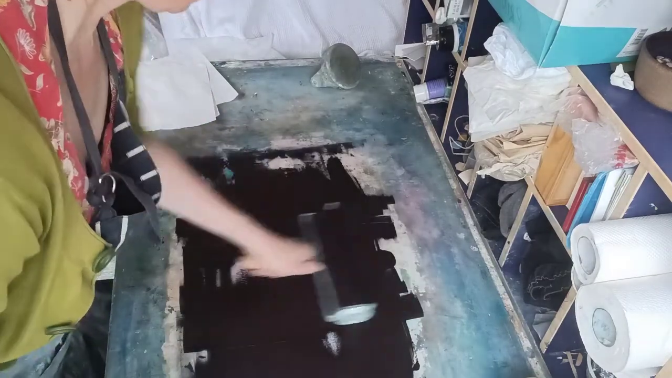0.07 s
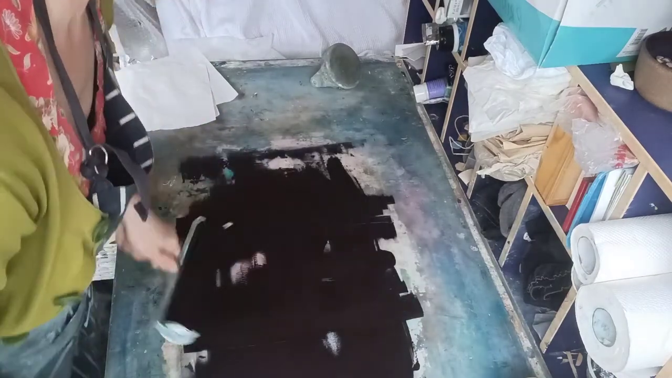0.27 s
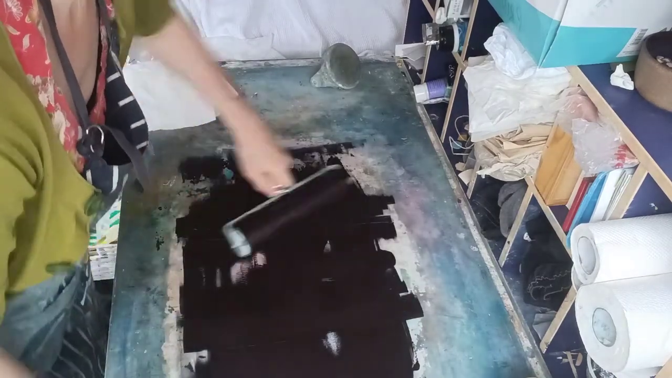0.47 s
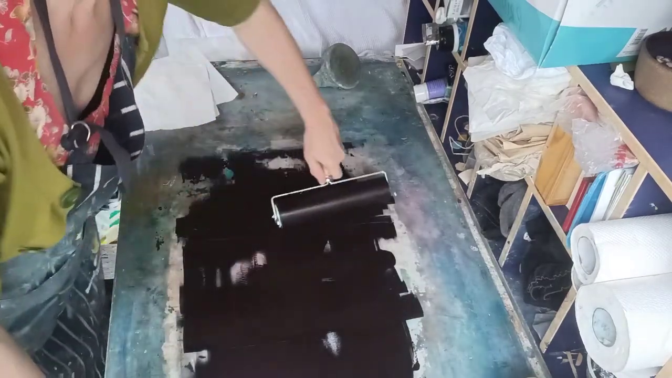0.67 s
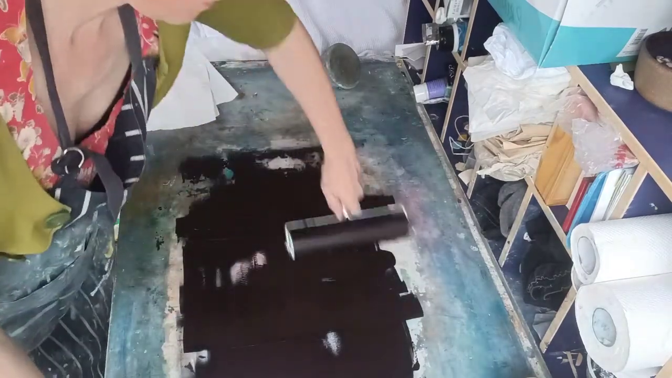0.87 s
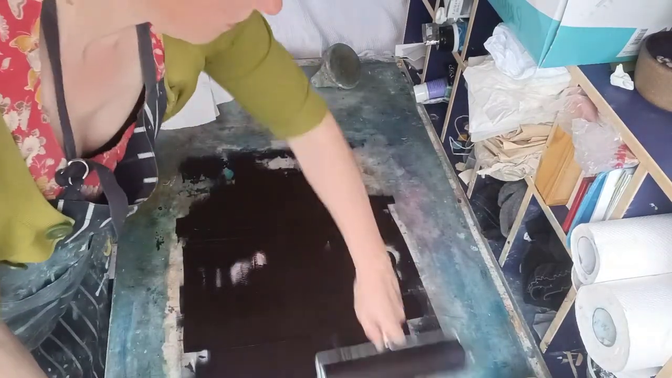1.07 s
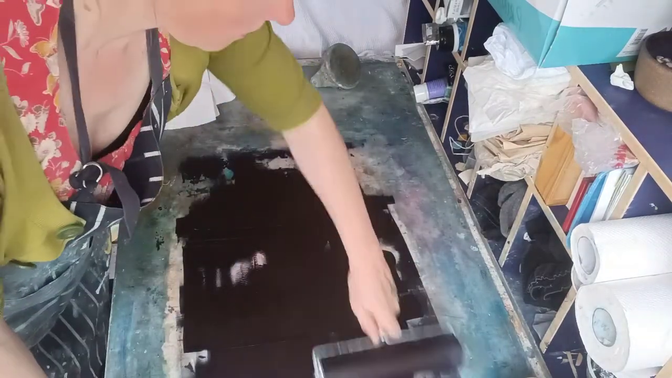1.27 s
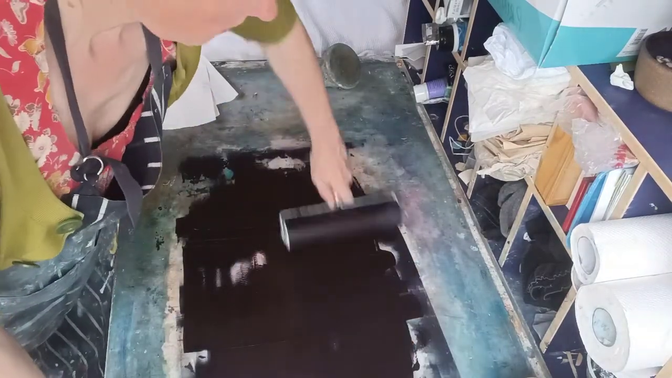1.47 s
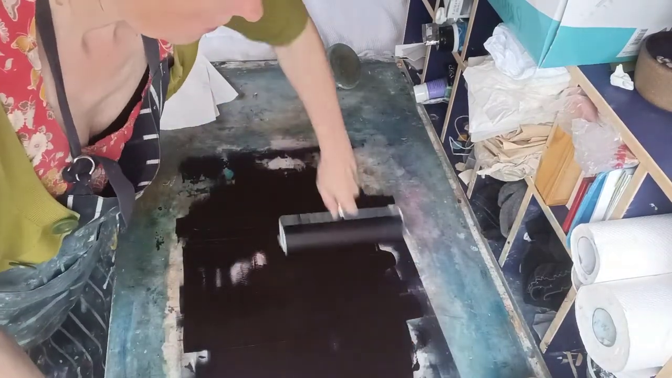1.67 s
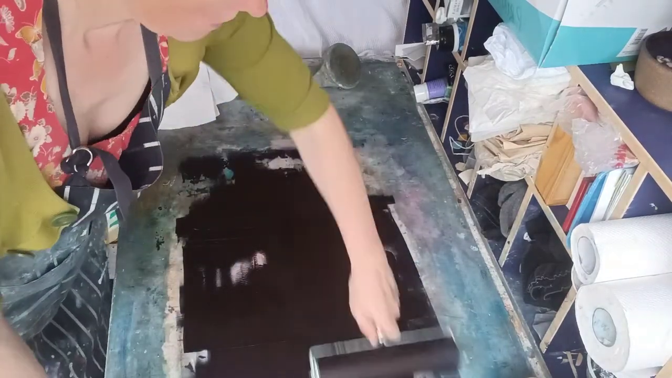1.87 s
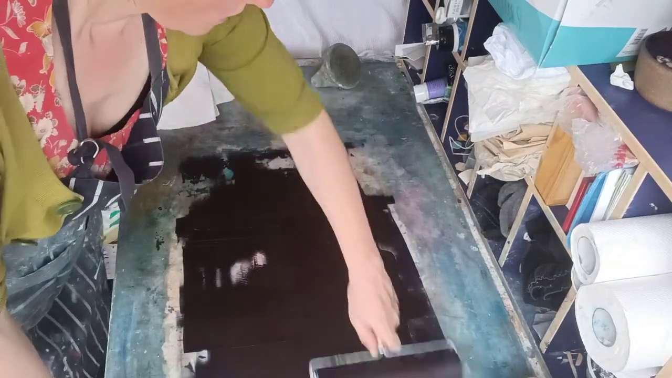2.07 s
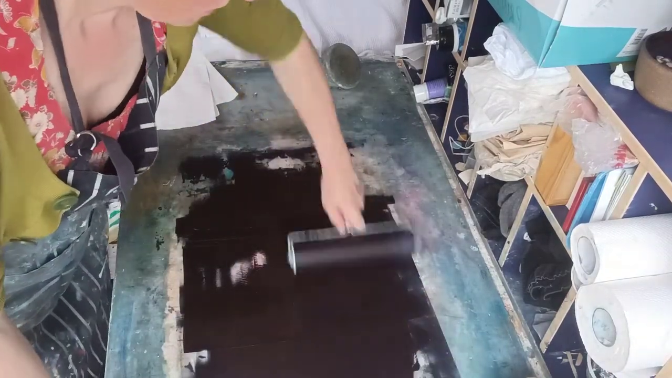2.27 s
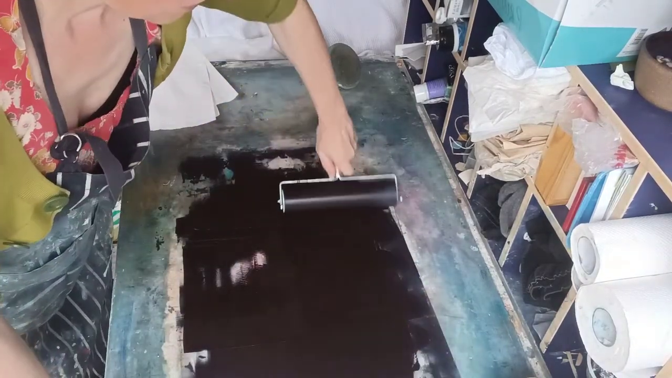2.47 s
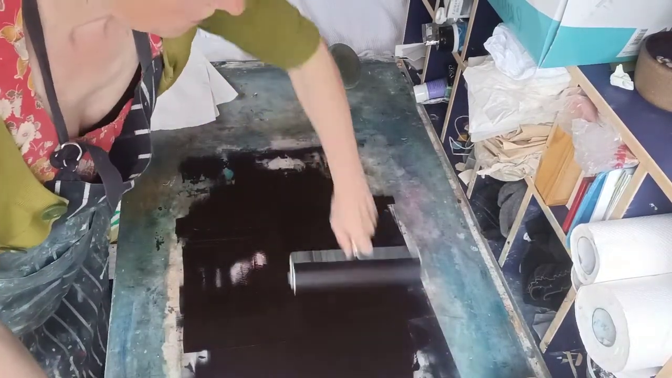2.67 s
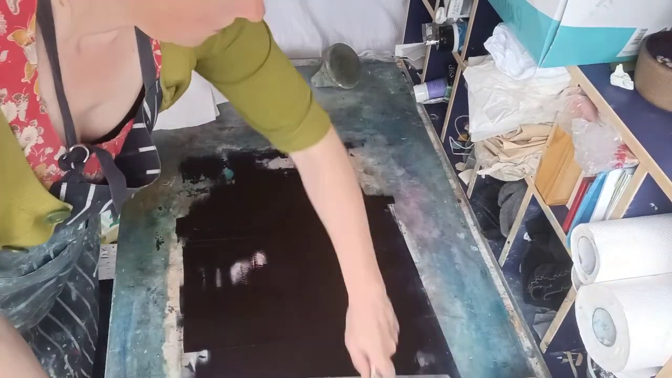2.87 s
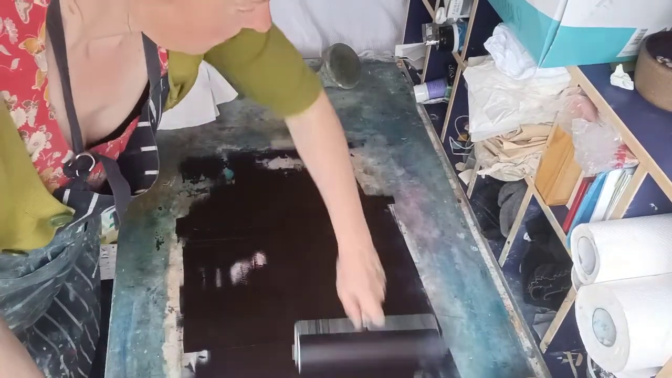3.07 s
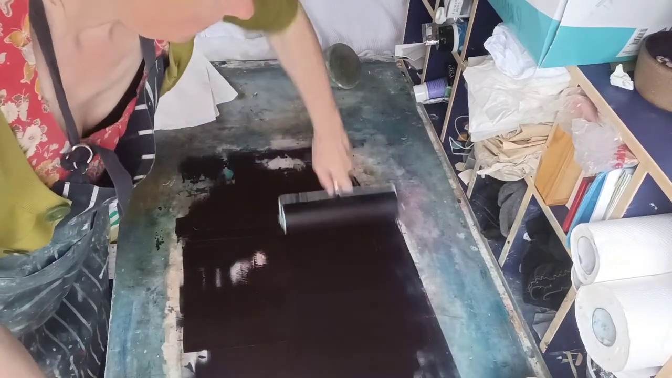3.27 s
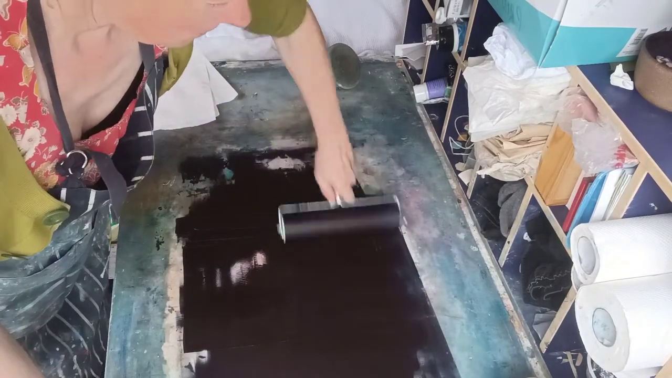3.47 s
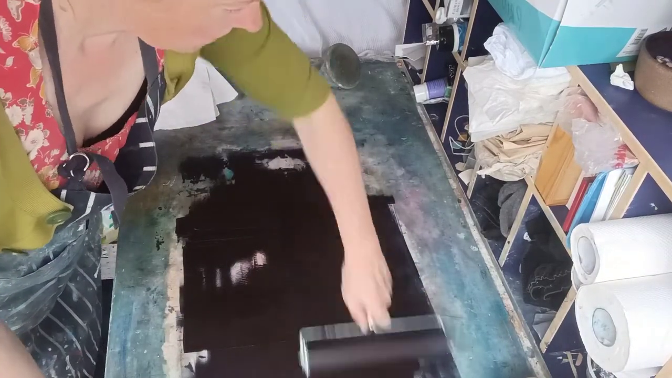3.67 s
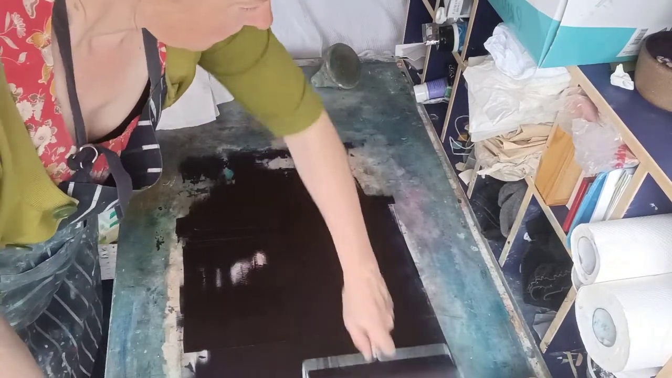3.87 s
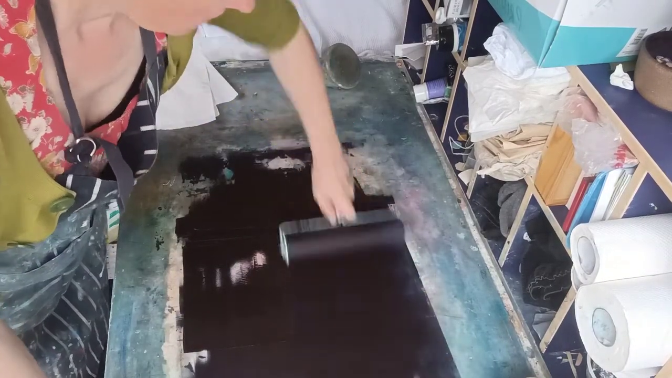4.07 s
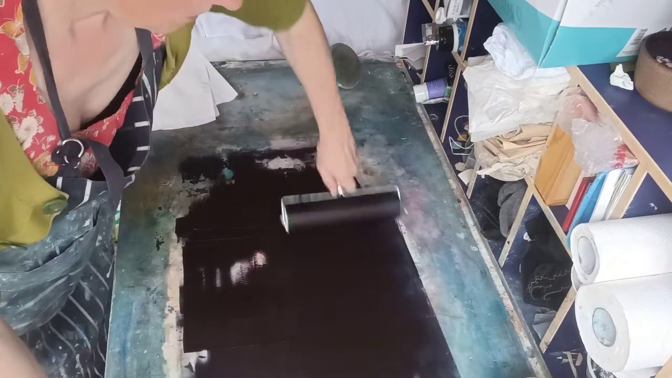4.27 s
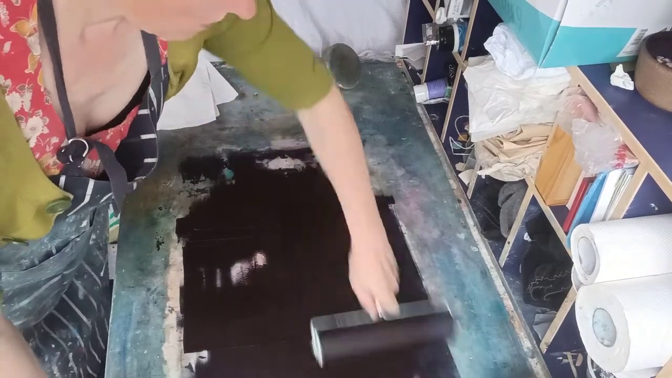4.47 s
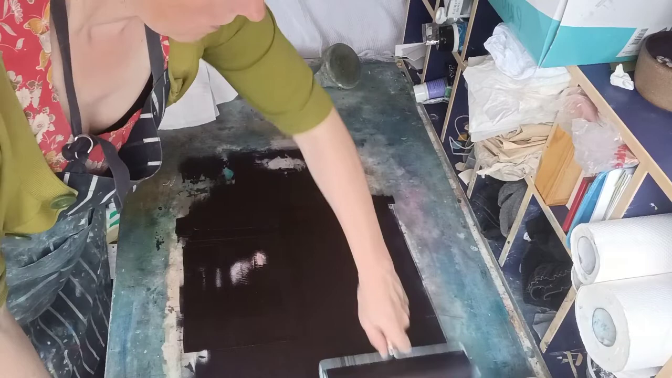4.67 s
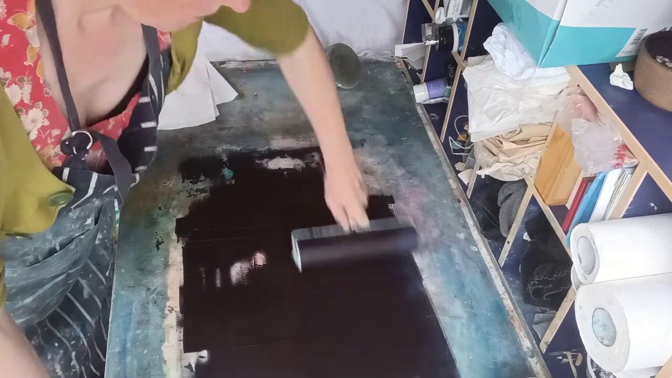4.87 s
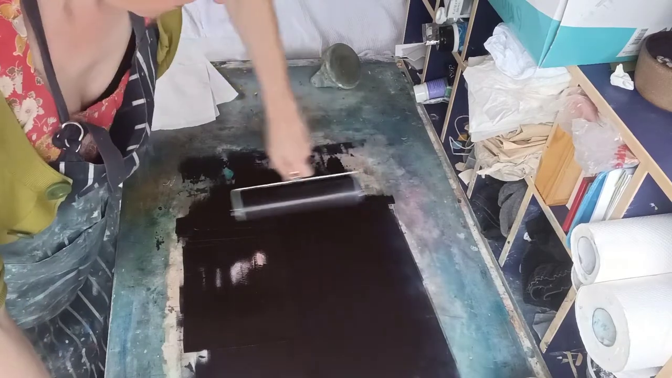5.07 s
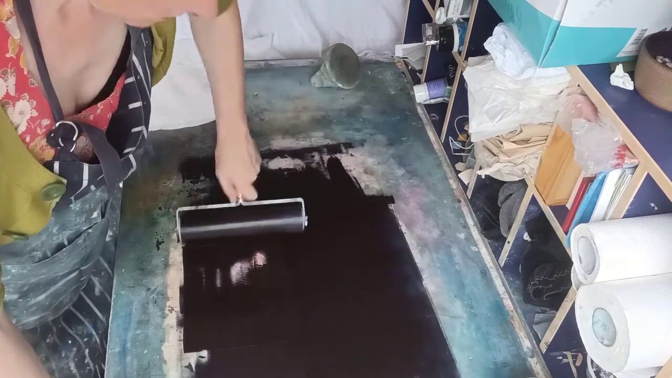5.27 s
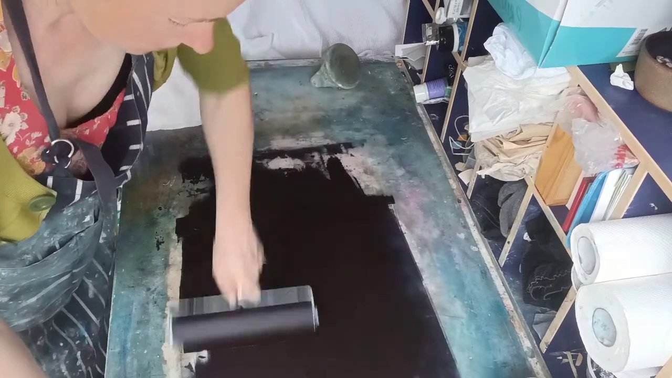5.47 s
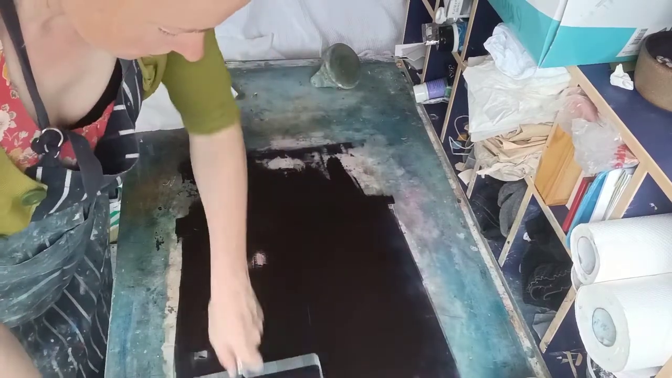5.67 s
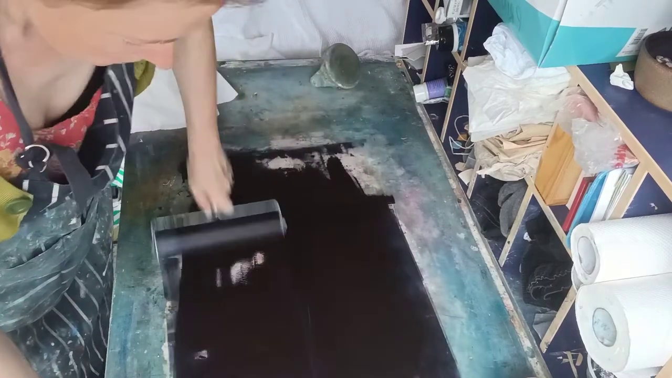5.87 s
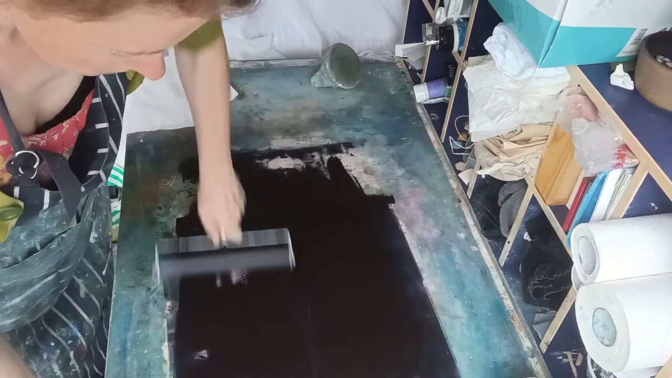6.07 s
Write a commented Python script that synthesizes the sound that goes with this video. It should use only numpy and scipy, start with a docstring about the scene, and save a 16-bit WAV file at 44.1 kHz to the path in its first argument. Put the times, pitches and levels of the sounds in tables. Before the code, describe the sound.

Close up in a small room, tacky ink hisses and crackles under a hand roller, stroke after stroke, the loose frame clicking between low table knocks.

```python
"""Ink sizzles as a rubber hand roller spreads it over a work table in quick strokes, to and fro, in a small room.
Random clicks make the snapping ink threads, the wet squelch, the table rumble and the grinding bearings.
Dying modes ring the table and roller as the roller thumps down on the far side and bumps over ridges of ink.
The loose axle clacks in its frame, a short burst with an echo and a ring; a sleeve and the room's air are
filtered noise."""
import sys
import numpy as np
from scipy import signal
from scipy.fft import rfft, irfft
from scipy.io import wavfile
from scipy.ndimage import uniform_filter1d

SR = 44100
rng = np.random.default_rng(int(sys.argv[2]) if len(sys.argv) > 2 else 0)


def pcm_store(signal):
    """Save signal as 16-bit PCM."""
    levels = np.round(np.clip(np.atleast_2d(signal), -1, 1) * 32767)
    wavfile.write(sys.argv[1], SR, levels.astype(np.int16).T)


N = 270112  # length [samples]

# Quiet of the room: (frequency [Hz], density [dB per Hz])
AIR_SPECTRUM = [(15, -36.5), (25, -47), (105, 5.5), (141, -2.5), (285, -5), (326, -11.5), (677, -19),
                (1070, -18), (1160, -23), (2220, -26.5), (2480, -27), (7310, -30), (16000, -28.5)]
AIR_DB = -76

# Reverberation: (frequency [Hz], t60 [s])
ROOM_T60 = [(100, 0.24), (1000, 0.12), (6000, 0.098), (15000, 0.095)]

# Stereo width: (frequency [Hz], side over mid [dB])
STEREO_WIDTH = [(80, -23.5), (350, -12), (700, -3.5), (1500, -2.5), (3000, 0.5), (7000, 0.5), (7900, -8.5),
                (15000, -14.5)]

# Balance of the microphones: (frequency [Hz], left over right [dB])
MIC_BALANCE = [(60, -0.5), (200, -1.6), (400, 1), (4400, .5), (8100, -0.2), (15000, -2)]
EDGE_HZ = 15800  # top of the band

# Sleeve brushing as the arm swings: (time [s], level [dB], half length [s])
SLEEVE_BRUSHES = [(0.33, -79, 0.02), (0.53, -76.5, 0.02), (0.598, -66, 0.035)]
# Swish of the cloth: (frequency [Hz], density [dB per Hz])
CLOTH_SPECTRUM = [(200, -1), (1500, 0.0), (3000, 0.5), (7000, -5), (10500, -10), (13000, -18)]

# Axle knocking in its frame: (time [s], level [dB], tilt [dB per octave])
AXLE_CLACKS = [(0.321, -67, -4), (0.624, -55, -12), (0.7174, -31.5, 7.5), (0.955, -36.5, -0.5),
               (1.1835, -31, -4), (1.546, -28, 11.5), (1.9999, -23, -1.5), (2.393, -41, 10),
               (2.423, -29, 10.5), (2.5427, -31.5, 2.5), (2.812, -47.5, -4.5), (2.9397, -31.5, 3.5),
               (2.946, -29.5, 2), (2.9767, -20, 17.5), (3.3333, -30.5, 6.5), (3.8057, -23, -3),
               (3.823, -20, 12.5), (3.439, -34.5, -1.5), (4.1675, -26.5, 7.5), (4.2603, -31, 1.5),
               (4.611, -32, -3.5), (4.766, -31.5, 10), (5.2094, -28.5, 10), (5.213, -23.5, 3),
               (5.508, -43.5, 3), (5.6075, -37, -5.5)]
# Colour of the roller frame: (frequency [Hz], density [dB per Hz])
FRAME_SPECTRUM = [(300, -33.5), (800, -14), (1400, -6.5), (2000, -1), (2600, 3.5), (3400, 0), (5000, 0),
                  (7000, -7), (10000, -26), (16000, -23)]
# Dying of the frame's ring: (frequency [Hz], t60 [s])
FRAME_T60 = [(800, 0.066), (1800, 0.17), (2600, 0.22), (3600, 0.21), (9000, 0.037)]
# A knock rings the roller too, the more the duller it is
AXLE_HZ, AXLE_RING_DB, AXLE_RING_PER_TILT = 2580, -12, 1.0
GRIP_T60_S = .16  # added damping of that note by the hand's grip

# Modes of the table top: (frequency [Hz], level [dB], t60 [s])
TABLE_MODES = [(93.1, 4, 0.21), (114.9, 6.5, 0.13), (163.9, 2.5, 0.17), (260, -5.5, 0.22),
               (317.4, 5.5, 0.065), (379.5, 4, 0.11), (499, -19.5, 0.27), (585.6, -17.5, 0.16),
               (680, -9, 0.13), (737, -8, 0.064), (830.6, -5, 0.084), (1041, -12, 0.027), (1172, -12, 0.11),
               (1290, -8.5, 0.073), (1502, -8, 0.07), (1570, -17, .07), (1943, -15, .1),
               (2245, -12.5, 0.091), (2445, -13, .1)]
# Modes of the roller and its handle: (frequency [Hz], level [dB], t60 [s])
ROLLER_MODES = [(726, 2, 0.078), (840, -5, 0.13), (1140, -18.5, .07), (1380, 10, 0.069), (1420, 1.5, 0.14),
                (1483, 9.5, 0.063), (1570, -15, 0.1), (1898, 5, 0.11), (2180, -11, .09),
                (2070, -6.5, 0.079), (2316, -2, 0.073), (2570, 3, 0.1)]

# Roller bumping over ridges of ink: (time [s], level [dB], softening above [Hz])
RIDGE_BUMPS = [(0.847, -37.5, 130), (0.951, -34.5, 120), (1.323, -30, 110), (1.427, -38.5, 170),
               (1.695, -32, 110), (1.75, -40.5, 250), (2.19, -38, 110), (2.217, -35, 110),
               (2.538, -32.5, 250), (2.629, -39.5, 110), (3.018, -36, 200), (3.108, -28, 151),
               (3.66, -47, 100), (3.952, -29.5, 126.7), (4.049, -34, 171), (4.252, -29.5, 200),
               (4.353, -30, 240), (4.785, -30.5, 150), (5.411, -35, 200), (5.778, -20, 450),
               (5.81, -31.5, 260), (5.961, -26.5, 298), (6.041, -29.5, 387)]
# Roller landing on the table: (time [s], level [dB], softening above [Hz],
# ink splat [dB], roller ring [dB], strongest roller ring at [Hz]); splat and ring are relative to the level
LANDINGS = [(.585, -38.5, 100, -36, -8, 1270), (0.6193, -24.5, 423, -7, -11, 1650),
            (.629, -29, 90, -11, -15, 1300), (1.504, -25.5, 170, -17.5, -37, 770),
            (2.3895, -21.5, 190, -16, -14, 740), (3.295, -32, 163, -21.5, -36, 790),
            (4.124, -52.5, 100, -18, -5, 1800), (4.166, -11, 600, -17, -38.5, 1283),
            (5.1818, -19, 700, -9, -10, 1420), (5.202, -14, 200, -9.5, -15.5, 1640),
            (5.215, -28, 333, -5, -8.5, 1640), (5.83, -42, 181, -25, -0.5, 740),
            (5.922, -31, 168, -11, -25, 1520)]
# Wet slap of the ink: (frequency [Hz], density [dB per Hz])
SPLAT_SPECTRUM = [(40, -18), (150, 13), (300, 4), (520, -6.5), (750, -0.5), (1100, -11), (1500, -11.5),
                  (2200, -8), (3000, -15.5), (6000, -12), (8000, -19.5), (9500, -9), (12500, -29),
                  (16000, -25.5)]

# Grinding of the bearings: (frequency [Hz], density [dB per Hz])
GRIND_SPECTRUM = [(1000, -27.5), (1750, -2.5), (2000, -4), (2250, -11.5), (2550, 2), (2900, -2.5),
                  (5000, -13)]
# Rumble of the table: (frequency [Hz], density [dB per Hz])
RUMBLE_SPECTRUM = [(25, -8), (50, -36.5), (75, -6), (100, 7.5), (130, 0.5), (170, 2.5), (215, -13.5),
                   (280, -8.5), (380, -5.5), (490, -46.5), (780, -44), (2000, -61)]
# Popping of the wet film: (frequency [Hz], density [dB per Hz])
SQUELCH_SPECTRUM = [(130, -7), (230, 6.5), (320, 14), (400, 9), (490, 4.5), (620, -1.5), (830, 0.5),
                    (1020, -11.5), (1180, -8.5), (1600, -11.5), (3000, -27.5), (8000, -50)]
# Tearing of thick ink threads: (frequency [Hz], density [dB per Hz])
TEAR_SPECTRUM = [(600, -24.5), (1050, -24), (1450, -14.5), (1750, -9), (2600, -6.5), (3200, -0.5),
                 (4200, 2), (6000, 4), (7800, 2), (10000, -25), (15000, -37.5)]
# Sizzle of fine ink threads: (frequency [Hz], density [dB per Hz])
SIZZLE_SPECTRUM = [(5000, -40), (7800, -19), (9000, -8), (10000, -2.8), (11000, -7.2), (12200, -12.3),
                   (13850, -13), (14500, -4.5), (15000, 0), (15800, -.3), (16100, -30)]

# Strokes of the hand, pushes and pulls in turn: (start [s], end [s], speeding up [s], slowing down [s],
# hardest press at [s], half length of the press [s], sizzle [dB], tearing [dB], squelch [dB],
# rumble [dB], grinding [dB]); the layers trim some of these levels further
HAND_STROKES = [(-0.25, 0.195, 0.15, 0.17, 0.077, 0.15, -41.5, -51.5, -51.5, -44.5, -67),
                (0.602, 1.068, 0.37, 0.18, 0.932, 0.11, -36, -46, -45, -38.5, -54),
                (1.083, 1.481, 0.18, 0.076, 1.279, 0.17, -37.5, -47.5, -50.5, -42.5, -60.5),
                (1.466, 1.87, 0.16, 0.15, 1.699, 0.063, -40, -49, -44.5, -39.5, -56.5),
                (1.906, 2.359, 0.14, 0.12, 2.094, 0.089, -38.5, -50.5, -49.5, -46.5, -68),
                (2.358, 2.842, 0.23, 0.19, 2.644, 0.11, -41, -48, -48, -43, -62.5),
                (2.832, 3.277, 0.18, 0.1, 3.053, 0.097, -38.0, -50, -51, -47, -65),
                (3.265, 3.694, 0.22, 0.13, 3.558, 0.19, -41, -49.5, -51.5, -40.5, -59),
                (3.708, 4.102, 0.13, 0.062, 3.916, 0.16, -38.5, -50.5, -52, -43, -63.5),
                (4.146, 4.5, 0.088, 0.11, 4.356, 0.15, -42, -51, -50, -43.5, -58),
                (4.538, 4.906, 0.095, 0.079, 4.711, 0.11, -38, -51.5, -50, -43, -62.5),
                (5.188, 5.555, 0.26, 0.2, 5.405, 0.13, -36, -43.5, -43, -36.5, -63.5),
                (5.521, 5.899, 0.13, 0.11, 5.813, 0.22, -36.5, -46, -45, -44, -61),
                (5.866, 6.3, 0.16, 0.15, 6.023, 0.22, -39, -46.5, -43, -40.5, -58)]
# How sizzle, tearing, squelch, rumble and grinding follow the hand, one row each: (power of the speed [-],
# loss away from the hardest press [dB], loss before the weight is on [dB]); a negative loss is a gain
HAND_LAWS = [(2.28, 0.36, 0), (2.2, -1.33, 9.5), (2.3, 23, 32), (2.9, 2.5, 52), (1.34, -1, 18.5)]
LEAN_PUSH_S, LEAN_PULL_S = 0.13, .02  # time the hand takes to put its weight on the roller


def gain_of(db):
    """Decibels to amplitude."""
    return 10 ** (np.asarray(db) / 20)


def evened(x):
    """Scales to rms 1."""
    return x / np.sqrt(np.mean(x ** 2) + 1e-20)


def ease(u):
    """A quarter sine from 0 to 1."""
    return np.sin(np.pi / 2 * np.clip(u, 0, 1))


def read(points, hz):
    """Reads a curve on a log-frequency axis."""
    f, value = np.transpose(points)
    return np.interp(np.log(hz + 1), np.log(f + 1), value)


def add(mix, s, sound):
    """Mixes a sound in at time s."""
    part = mix[max(round(s * SR), 0):][:len(sound)]
    part += sound[:len(part)]


def colour(x, points, tilt_db=0):
    """Minimum-phase filter of unit energy with the given spectrum, tilted about 3 kHz in dB per octave."""
    size = 4096
    hz = abs(np.fft.fftfreq(size, 1 / SR))
    octaves = np.log2((hz + 300) / 3300)  # flattens out in the bass
    log_gain = np.log(gain_of(read(points, hz) + tilt_db * octaves))
    response = np.exp(signal.hilbert(log_gain).conj())
    taps = np.fft.ifft(response).real[:size // 2]
    return signal.oaconvolve(x, taps / np.linalg.norm(taps))[:len(x)]


def dying(x, t60s):
    """Lets each band of x die at its own speed."""
    hz, t, bands = signal.stft(x, SR, nperseg=256)
    decay = gain_of(-60 * t / read(t60s, hz)[:, None])
    return signal.istft(bands * decay, SR, nperseg=256)[1][:len(x)]


def wander(rate_hz):
    """Slow random drift of rms 1, rolling off above the given rate."""
    hz = np.fft.rfftfreq(N, 1 / SR)
    slowed = rfft(rng.standard_normal(N)) / (1 + (hz / rate_hz) ** 2)
    return evened(irfft(slowed, N))


def snaps(per_s, spread_db):
    """Random clicks of uneven size and either sign, rms 1."""
    size = gain_of(spread_db * np.minimum(rng.exponential(1, N), 5))
    size = size * rng.choice([-1, 1], N)
    return evened(size * (rng.random(N) < per_s / SR))


def patchy(x, depth_db, count, order):
    """The colour drifts in patches of count frames by order bins as the roller moves across the table."""
    bands = signal.stft(x, SR, nperseg=1024)[2]
    field = uniform_filter1d(rng.standard_normal(bands.shape), count, 1)
    field = evened(uniform_filter1d(field, order, 0))
    return evened(signal.istft(bands * gain_of(depth_db * field), SR, nperseg=1024)[1][:N])


def rings(modes, weight):
    """The sum of dying modes, each weighted by a function of its frequency; peak 1."""
    t = np.arange(round(.5 * SR)) / SR
    hz, db, t60 = np.transpose(modes)[:, :, None]
    place = 1 + 0.009 * rng.standard_normal(hz.shape)  # the load differs a little from spot to spot
    sign = (-1) ** np.arange(1, len(hz) + 1)[:, None]
    envelope = sign * weight(hz) * gain_of(db - 60 * t / t60)
    ring = (envelope * np.sin(2 * np.pi * hz * place * t)).sum(0)
    return ring / abs(ring).max()


def room_air():
    """The quiet of the room is steady coloured noise."""
    return gain_of(AIR_DB) * evened(colour(rng.standard_normal(N), AIR_SPECTRUM))


def room(x, wet_db=-19):
    """A short, faint tail of dying noise from the cluttered room."""
    tail = dying(rng.standard_normal(SR // 3), ROOM_T60)
    tail[:SR // 200] = 0  # the tail waits 5 ms
    return x + gain_of(wet_db) * signal.oaconvolve(x, tail / np.linalg.norm(tail))[:N]


def sleeve():
    """Cloth swishes softly: coloured noise under smooth swells."""
    t = np.arange(N) / SR
    swell = sum(gain_of(db) * np.exp(-((t - s) / half_s) ** 2) for s, db, half_s in SLEEVE_BRUSHES)
    return swell * evened(colour(rng.standard_normal(N), CLOTH_SPECTRUM))


def table_ring(soft_hz, spring=0.26):
    """A soft blow rings the table's low modes, a hard one the middle ones."""
    return rings(TABLE_MODES, lambda hz: 1 / (1 + (hz / soft_hz) ** 2) / np.hypot(1, spring * soft_hz / hz))


def roller_ring(free_hz, reach_octaves=0.28):
    """The roller itself rings briefly, in the modes that the hand leaves free."""
    return rings(ROLLER_MODES, lambda hz: 1 / (1 + (np.log2(hz / free_hz) / reach_octaves) ** 2))


def clacks(hit_db=4, echo_s=0.0012, echo_db=-2, crack_s=0.0044, crack_db=-11, ring_db=-22):
    """A sharp knock of the axle, its echo off the table, the frame's dense ring and a damped roller note."""
    out, t = np.zeros(N), np.arange(SR // 5) / SR
    for s, db, tilt_db in AXLE_CLACKS:
        crack, ring = rng.standard_normal((2, len(t)))
        knock = gain_of(crack_db) * crack * np.exp(-t / crack_s)
        knock += gain_of(ring_db) * dying(ring, FRAME_T60)
        knock[[0, round(echo_s * SR)]] += gain_of([hit_db, echo_db])
        note_db = AXLE_RING_DB - AXLE_RING_PER_TILT * tilt_db - 60 * t / GRIP_T60_S
        note = roller_ring(AXLE_HZ)[:len(t)] * gain_of(note_db)
        add(out, s, gain_of(db) * (colour(knock, FRAME_SPECTRUM, tilt_db) + note))
    return out


def bumps(climb_s=0.00297):
    """Ridges of ink nudge the table top as the roller climbs them."""
    out = np.zeros(N)
    for s, db, soft_hz in RIDGE_BUMPS:
        ring = table_ring(soft_hz)
        t = np.arange(len(ring)) / SR
        add(out, s, gain_of(db) * ring * (1 - np.exp(-t / climb_s)))
    return out


def thumps(splat_t60=0.11, contact_s=0.0025, punch_db=-1, punch_s=0.0076):
    """Each landing rings the table, punched up at first, and the roller; the ink slaps."""
    out = np.zeros(N)
    for s, db, soft_hz, splat_db, ring_db, free_hz in LANDINGS:
        table = table_ring(soft_hz)
        t = np.arange(len(table)) / SR
        punch = np.sqrt(.5 + 2 * gain_of(punch_db) * np.exp(-t / punch_s))
        slap = colour(rng.standard_normal(len(t)) * gain_of(-60 * t / splat_t60), SPLAT_SPECTRUM)
        blow = punch * table + gain_of(ring_db) * roller_ring(free_hz) + gain_of(splat_db) * slap
        add(out, s, gain_of(db) * blow * (1 - np.exp(-t / contact_s)))
    return out


def bearings(load):
    """Fine grit in the bearings rubs under the load of the hand."""
    return load * evened(colour(snaps(per_s=6700, spread_db=4.5), GRIND_SPECTRUM))


def rumble(weight, bounce_db=-8, bounce_s=0.021):
    """Small lumps in the ink shake the table top, less so around each thump or bump as the roller rebounds."""
    t, lift = np.arange(N) / SR, np.zeros(N)
    for s, *_ in LANDINGS + RIDGE_BUMPS:
        lift = np.maximum(lift, 1 - abs(t - s - bounce_s / 2) / (2 * bounce_s))
    lumps = colour(snaps(per_s=770, spread_db=2.5), RUMBLE_SPECTRUM)
    return gain_of(bounce_db * lift) * weight * patchy(lumps, depth_db=5, count=4, order=3)


def squelch(wet, thick, pluck_db=-15, lowest_hz=900):
    """The wet film pops under the roller, and the thickest threads pluck the table's upper modes."""
    pops = colour(snaps(per_s=1500, spread_db=2), SQUELCH_SPECTRUM)
    film = patchy(pops, depth_db=3, count=5, order=3)
    ring = rings(TABLE_MODES, lambda hz: 1 / (1 + (lowest_hz / hz) ** 4))
    plucks = evened(signal.oaconvolve(snaps(per_s=1500, spread_db=6.5), ring)[:N])
    return wet * film + gain_of(pluck_db) * thick * plucks


def stroke_gains():
    """The hand speeds up, holds and slows down, pressing hardest on the way; five rolling sounds follow it."""
    t, gains = np.arange(N) / SR, np.zeros((len(HAND_LAWS), N))
    for k, (start, end, rise_s, fall_s, press_at, press_s, *levels_db) in enumerate(HAND_STROKES):
        on = (t > start) & (t < end)
        speed = ease((t[on] - start) / rise_s) * ease((end - t[on]) / fall_s)
        lean = ease((t[on] - start) / (LEAN_PULL_S if k % 2 else LEAN_PUSH_S))
        press = np.exp(-((t[on] - press_at) / press_s) ** 2)
        for gain, db, (power, slack_db, light_db) in zip(gains, levels_db, HAND_LAWS):
            held_db = db - slack_db * (1 - press) - light_db * (1 - lean)
            gain[on] += speed ** power * gain_of(held_db)
    return gains


def ink(fine, thick, thick_db=-1.5, flutter_db=1.4, coarse_db=-9, echo_s=0.001395, echo_db=-14):
    """Threads of ink stretch and snap along the line where the roller lifts off; a few coarse ones crackle."""
    tack = gain_of(flutter_db * wander(rate_hz=15))
    fine_snaps = colour(snaps(per_s=24000, spread_db=3.5), SIZZLE_SPECTRUM)
    sizzle = patchy(fine_snaps, depth_db=1.5, count=4, order=10)
    coarse = gain_of(coarse_db) * snaps(per_s=270, spread_db=3)
    thick_snaps = colour(snaps(per_s=8000, spread_db=1.5) + coarse, TEAR_SPECTRUM)
    # a near reflection ripples the colour
    thick_snaps = thick_snaps + gain_of(echo_db) * np.roll(thick_snaps, round(echo_s * SR))
    tearing = patchy(thick_snaps, depth_db=3.5, count=6, order=4)
    return tack * (fine * sizzle + gain_of(thick_db) * thick * tearing)


def sources(fine, thick, wet, weight, load):
    """Roller, table, arm and room, as heard from one direction."""
    rolling = ink(fine, thick) + squelch(wet, thick) + rumble(weight) + bearings(load)
    return room(rolling + thumps() + bumps() + clacks() + sleeve()) + room_air()


def spread(mid, side):
    """Mid and quarter-turned side make an image whose width and balance vary with frequency."""
    hz = np.fft.rfftfreq(N, 1 / SR)
    mid = rfft(mid)
    side = 1j * rfft(side) * gain_of(read(STEREO_WIDTH, hz))
    balance = gain_of(read(MIC_BALANCE, hz) / 2)  # half the difference on each side
    return np.array([irfft((mid + side) * balance, N), irfft((mid - side) / balance, N)])


def scene():
    """The same strokes reach the microphones from ahead and from the sides, with separate random detail."""
    gains = stroke_gains()
    return spread(sources(*gains), sources(*gains))


def record(dry, low_cut_hz=52):
    """The microphone's bass cut, then the band limit."""
    bass_cut = signal.butter(2, low_cut_hz, "high", fs=SR, output="sos")
    thinned = signal.sosfilt(bass_cut, dry)
    band_limit = signal.firwin(1535, EDGE_HZ, window=("kaiser", 8), fs=SR)
    return signal.oaconvolve(thinned, band_limit[None], "same")


dry = scene()
out = record(dry)
pcm_store(out)
```